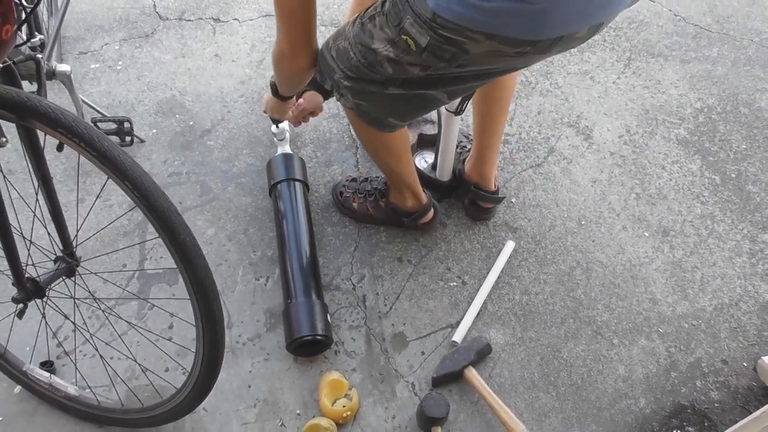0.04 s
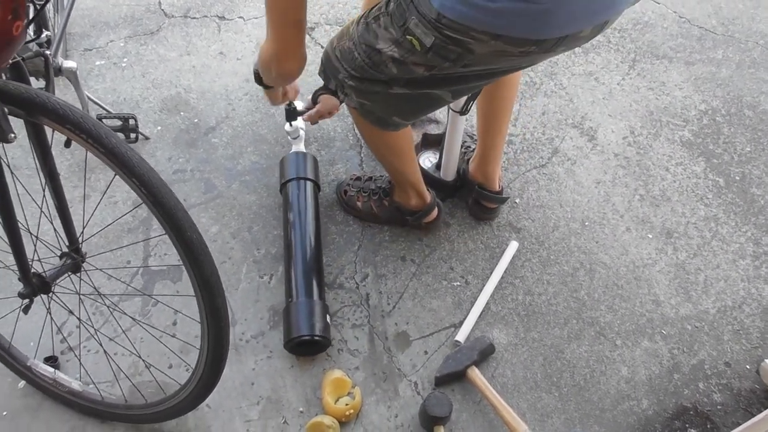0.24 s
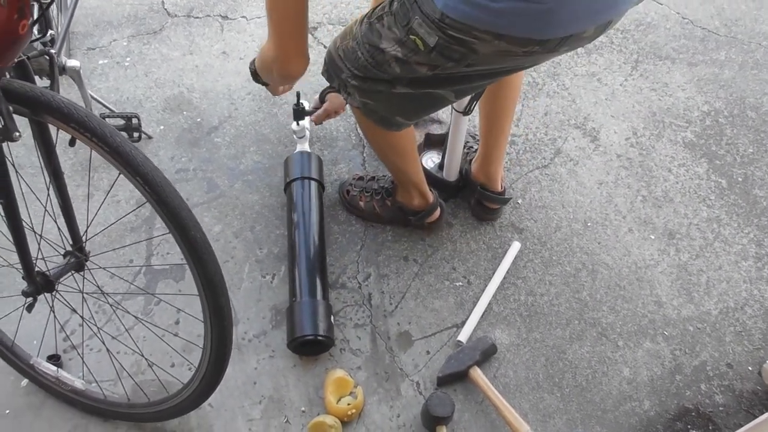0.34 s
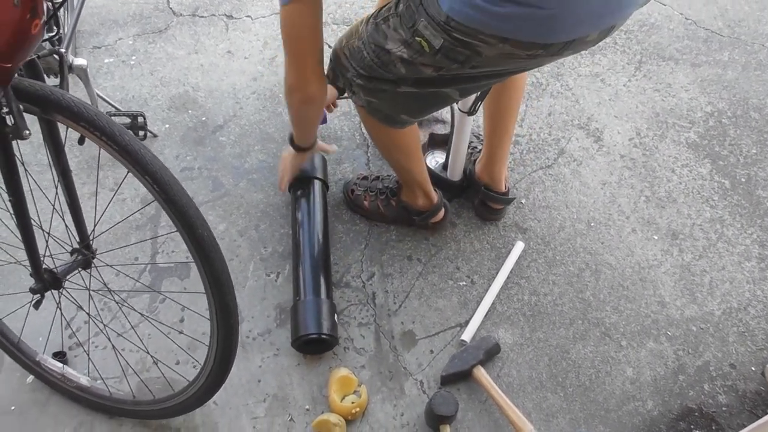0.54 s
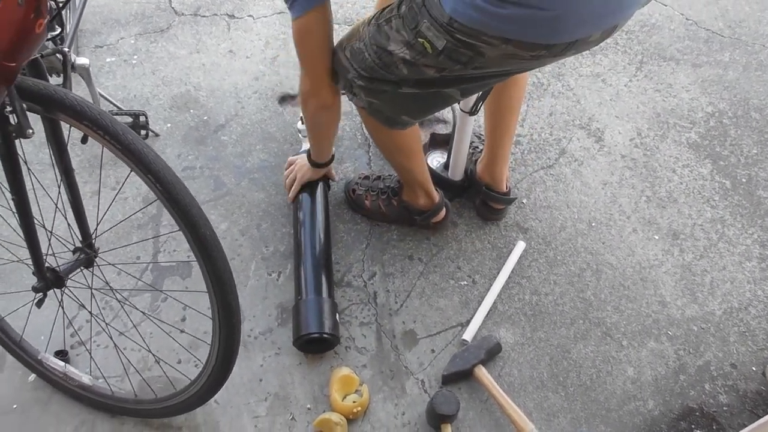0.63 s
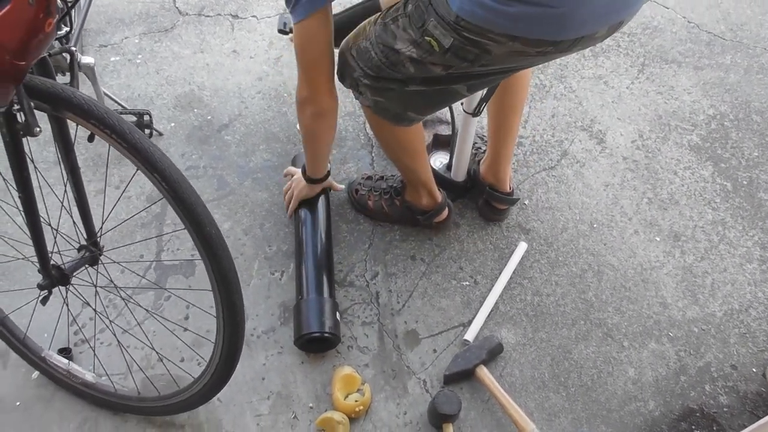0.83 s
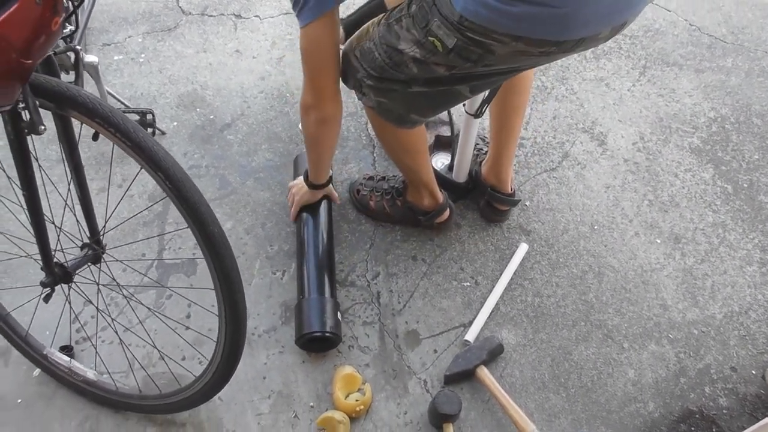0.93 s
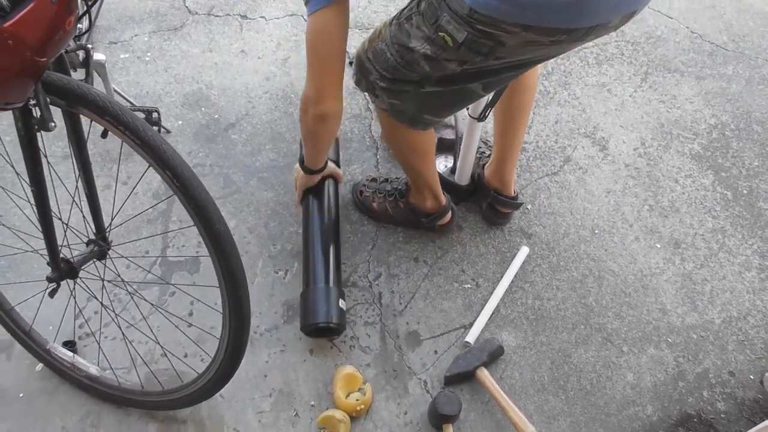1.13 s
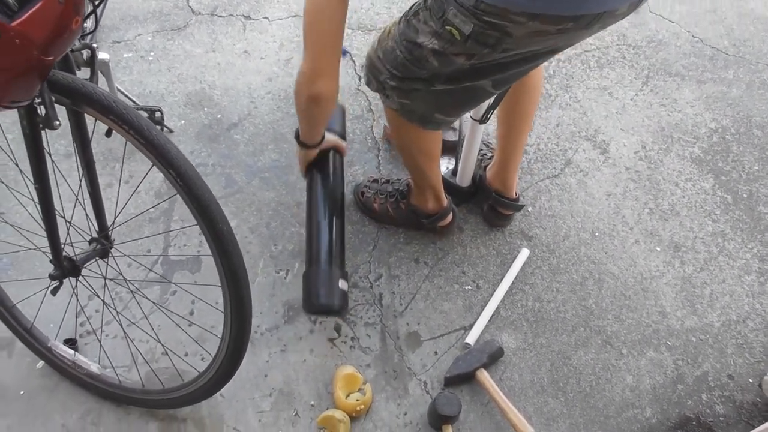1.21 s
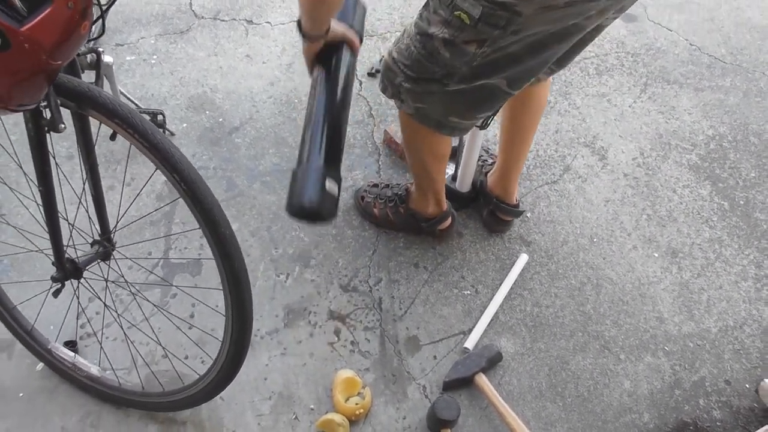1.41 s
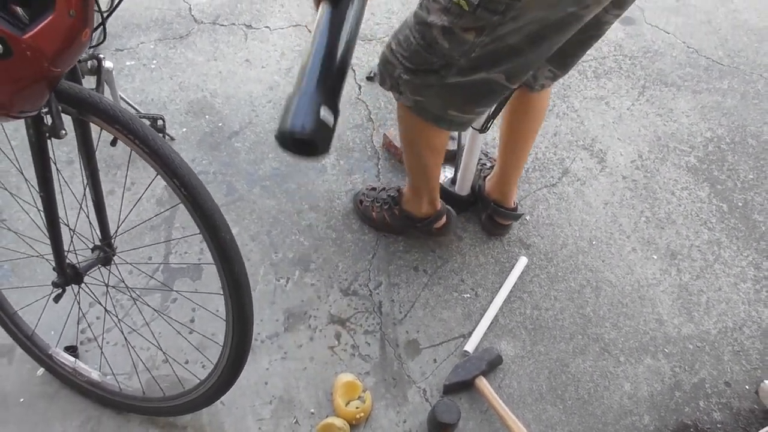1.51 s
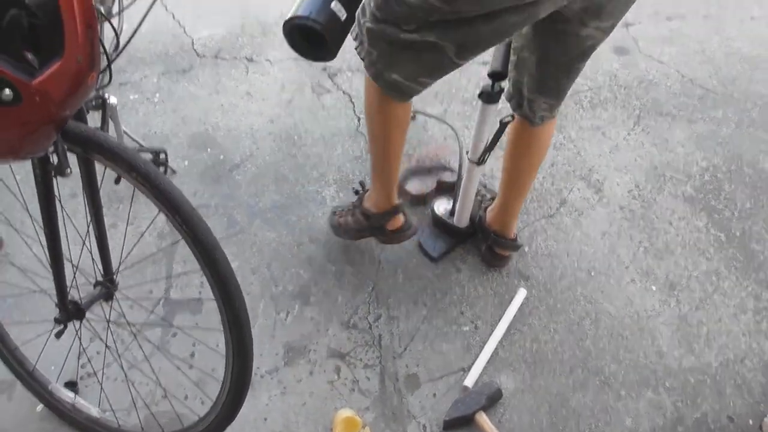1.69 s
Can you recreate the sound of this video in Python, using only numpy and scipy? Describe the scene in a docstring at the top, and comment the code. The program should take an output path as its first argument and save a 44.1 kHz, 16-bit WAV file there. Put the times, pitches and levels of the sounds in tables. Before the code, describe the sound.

A hose coupling hisses and pops off a metal cylinder outdoors. Its latch clunks at 0.2 seconds with a brief hum, and air leaks until a sharp, ringing burst at 0.5. A faint palm swish follows. At 1.0 the cylinder knocks hollowly on concrete, then scrapes over grit until 1.3. Small fittings tap and click around 1.6 to 1.7, over a low, steady open-air background.

```python
"""A hose coupling hisses and pops off a pressurised cylinder lying in a concrete yard.
First its latch clunks and the cylinder hums. Air leaks past the seal, then bursts out and
sets the metal fitting ringing. A palm slides along the cylinder, which knocks on the ground
and scrapes over grit while small parts tap and click. The yard echoes and the open air murmurs."""
import sys
import numpy as np
from scipy import signal
from scipy.fft import rfft, irfft
from scipy.io import wavfile
from scipy.ndimage import uniform_filter1d

SR = 44100
rng = np.random.default_rng(int(sys.argv[2]) if len(sys.argv) > 2 else 0)


def bounce(signal):
    """Save signal as a 16-bit WAV file at the path given by the first command-line argument."""
    frames = np.transpose(np.atleast_2d(signal))
    limited = np.clip(frames, -1, 1)
    pcm = np.round(limited * 32767).astype(np.int16)
    wavfile.write(sys.argv[1], SR, pcm)


N = 77175

# Tone colours: how strong each sound is from bass to treble (frequency [Hz], relative level [dB])
OUTDOOR_TONE = [(20, -11), (55, 1.5), (100, -3.5), (330, -3), (430, -9.5), (850, -9.5), (1300, -22),
                (2800, -33.5), (3800, -31.5), (5100, -40.5), (7600, -28), (10000, -32.5), (16000, -40)]  # open air
SHIMMER_TONE = [(200, -31), (3000, -25.5), (4200, -13), (5300, -15), (6600, 0), (8400, 2), (11000, -10),
                (16000, -14)]  # metal stirred by a palm or by the pop
GRIT_TONE = [(200, 2), (700, 15.5), (1400, 0.5), (2500, -8), (3800, -4), (5200, -11.5), (7600, 0),
             (10500, -15.5), (16000, -29)]  # grit under the cylinder
CLICK_TONE = [(100, -17), (750, -2.5), (2000, -21), (3600, -6.5), (5200, -8), (6600, 2.5), (8200, 0.5),
              (11000, -13), (16000, -23)]  # small fittings
TAP_TONE = [(100, -30), (500, -4), (1000, 1.5), (1450, -6), (1800, -16.5), (3000, -28), (3700, -15),
            (5000, -29), (16000, -42)]  # hollow taps
KNOCK_TONE = [(100, -42), (180, -7.5), (450, -8.5), (650, 1.5), (1000, 2), (1500, -7), (2400, -5),
              (2800, -25), (3300, -6.5), (4100, -21), (5200, -42.5), (16000, -54)]  # cylinder hitting concrete
JUDDER_TONE = [(100, -32), (180, 0), (500, 2), (1000, 0), (1500, -13), (3500, -14), (5200, -25.5),
               (7800, -13.5), (16000, -44)]  # shaking after the knock
THUD_TONE = [(40, -27), (120, -3.5), (255, 7), (450, -6), (700, -5.5), (1200, -20.5), (1800, -33.5),
             (16000, -61)]  # dull part of the latch
SNAP_TONE = [(200, -5), (670, 11.5), (1200, 1), (2000, -9), (2450, -1.5), (2800, -18.5), (3400, -9),
             (5200, -20.5), (16000, -18)]  # sharp part of the latch
HISS_TONE = [(880, -37.5), (2190, -22.5), (3450, -16), (5540, -15.5), (8160, -2), (10100, -6),
             (16000, -4.5)]  # leaking air
PUFF_TONE = [(20, 7.5), (120, 4.5), (250, -2.5), (600, 4), (980, -1.5), (1250, -14.5), (4000, -32.5),
             (16000, -53)]  # low part of the pop
BURST_TONE = [(100, -14), (1500, -13.5), (2400, -13), (2900, -16), (4800, -20), (6200, -5.5), (8000, 0.5),
              (10000, -2), (13000, -1), (16000, -8)]  # bright part of the pop

# Loudness of the sliding palm, the scraping and the leaking air (time [s], level [dB])
SWISH_LEVEL = [(.7, -57), (.83, -62.5), (.885, -55.5), (.935, -79)]
SCRAPE_LEVEL = [(.98, -77), (1.015, -57), (1.06, -37.5), (1.15, -49.5), (1.21, -42.5), (1.28, -50.5),
                (1.35, -71), (1.52, -55.5), (1.66, -59)]
LEAK_LEVEL = [(.2, -55), (.235, -47.5), (.262, -41), (.315, -36.5), (.38, -40), (.45, -45.5), (.49, -40),
              (.5, -27), (.52, -85)]

# Notes that things ring with (frequency [Hz], relative level [dB], time to fade by 60 dB [s])
KNOCK_NOTES = [(191, -2.5, 0.11), (363, -2.5, 0.19), (425, -3.5, 0.17), (655, 2, 0.13), (837, -5, 0.14),
               (950, 0.5, 0.19), (1030, -2.5, .15), (1144, 2, 0.097), (1863, -9, 0.1), (2300, -4, 0.076)]  # cylinder hitting concrete
HUM_NOTES = [(75.6, -10, .25), (142, -9, 0.27), (210.3, -5.5, 0.35), (267, -10, .15), (335, 0, .28),
             (432, -11.5, 0.12), (708, -18, .14), (783, -12, 0.2)]  # cylinder and hose
FITTING_NOTES = [(6092, -8, 0.18), (6900, -9, 0.16), (6778, -13, 0.12), (7400, -11, .14), (7550, -6, 0.047),
                 (7900, -10.5, .09), (8100, -3, 0.13), (7850, -7, .1), (8940, 1, 0.083), (10410, 8, .055),
                 (12500, -4, .06), (13060, 3.5, 0.041)]  # metal fitting after the pop

# Single crunches of grit (time [s], level [dB], strongest frequency [Hz])
GRIT_CRUNCHES = [(1.0491, -12, 8700), (1.1868, -21, 7700), (1.207, -22, 7450), (1.262, -24.5, 7400)]
# Clicks of the fittings (time [s], level [dB])
FITTING_CLICKS = [(.556, -15.5), (0.8139, -22.5), (1.0108, -10.5), (1.6232, -26), (1.6333, -32.5),
                  (1.708, -9), (1.7122, -14.5)]
# Light hollow taps (time [s], level [dB], ring pitch [Hz], ring level [dB], ring fade time [s])
HOLLOW_TAPS = [(0.1839, -15.5, 1010, -17.5, 0.033), (1.5917, -24, 975, -17, 0.14),
               (1.7092, -14, 715, -16.5, 0.087)]
# Clunks of the latch (time [s], thud [dB], hum [dB], snap [dB], ping [dB], ping pitch [Hz])
LATCH_CLUNKS = [(0.2102, 1, -28, -14, -13, 6640), (0.2214, -17, 2.5, -3.5, -7, 7520),
                (0.3134, -4.5, -9, -45, -45, 7600)]

# Length of the yard's echo (frequency [Hz], time to fade by 60 dB [s])
ECHO_FADE = [(100, .3), (350, .22), (700, 0.08), (3000, 0.5), (7500, .5), (15000, 0.23)]
# Strength of the yard's echo (frequency [Hz], level [dB])
ECHO_LEVEL = [(60, -22), (300, -13.5), (800, -14), (2400, -12), (3400, -7.5), (7500, -11), (15000, -17)]
# Stereo width: gain on the part that differs between left and right (frequency [Hz], gain [dB])
SIDE_GAIN = [(2100, 1.5), (2800, -10.5), (5800, -25), (6900, -36), (7500, -3), (14000, 12)]

GRAIN_WIDTH = 0.21  # stereo width of the rubbing and the grit; 0 is mono


def amp(db):
    """Turn decibels into a number to multiply by."""
    return 10 ** (np.asarray(db) / 20)


def value_at(points, hz):
    """Look up a table at any frequency, gliding between its rows on a pitch scale."""
    freqs, values = np.transpose(points)
    return np.interp(np.log(hz + 1), np.log(freqs + 1), values)


def loudness(points):
    """Join (time, level) points into a smooth gain, near silence before and after."""
    return amp(np.interp(np.arange(N) / SR, *np.transpose(points), left=-120, right=-120))


def unit_energy(x):
    """Scale a sound to an average energy of one per channel."""
    return x / np.sqrt(np.mean(np.sum(x ** 2, -1)) + 1e-20)


def add(mix, start_s, sound):
    """Mix a sound in at its start time."""
    part = mix[:, round(start_s * SR):][:, :sound.shape[-1]]
    part += sound[..., :part.shape[1]]


def noise(count, width):
    """Stereo white noise; more width makes left and right less alike."""
    mid, side = rng.standard_normal((2, count))
    return np.array([mid + width * side, mid - width * side])


def colour(x, tone, size=4096):
    """Give a sound a tone colour, with a filter that never rings ahead of the sound."""
    log_gain = np.log(amp(value_at(tone, abs(np.fft.fftfreq(size, 1 / SR)))))
    response = np.fft.ifft(np.exp(np.conj(signal.hilbert(log_gain)))).real[:size // 2]
    return signal.fftconvolve(x, response[None], axes=1)[:, :x.shape[1]]


def peak(hz, slope_db):
    """A tone colour with one hump, slope_db weaker an octave to either side."""
    return [(hz / 2, -slope_db), (hz, 0), (hz * 2, -slope_db)]


def hit(tone, fade_s, rattle, width, size=8192):
    """One sharp push and a rattle that drops 60 dB in fade_s, both given a tone colour."""
    fade = amp(-60 * np.arange(size) / SR / fade_s)
    push = rattle * unit_energy(noise(size, width) * fade)
    push[:, 0] += 1
    return unit_energy(colour(push, tone))


def ring(notes, width, sharp=0, settle_s=0.03):
    """Fading pure notes; they start too high by the fraction `sharp`, then settle."""
    t = np.arange(SR // 2) / SR
    bent_time = t + sharp * settle_s * (1 - np.exp(-t / settle_s))
    skews = width * rng.standard_normal((len(notes), 1, 1)) * [[1], [-1]]  # left and right out of step
    return unit_energy(sum(amp(db - 60 * t / fade_s) * np.sin(2 * np.pi * hz * bent_time + skew)
                           for (hz, db, fade_s), skew in zip(notes, skews)))


def outdoors(level_db=-48):
    """The open air murmurs, low and steady."""
    murmur = colour(noise(N, width=0.16), OUTDOOR_TONE)
    return amp(level_db) * murmur / murmur.std()


def yard_echo(x, delay_s=0.006):
    """Ground and walls scatter the sound back, each frequency fading at its own speed."""
    hz, t, bands = signal.stft(noise(SR, width=0.43), SR, nperseg=256)
    fade_s = value_at(ECHO_FADE, hz)[:, None]
    fade = amp(value_at(ECHO_LEVEL, hz)[:, None] - 60 * t / fade_s)
    balance = np.sqrt(2 * np.log(1000) / fade_s / SR)  # a longer fade adds no energy
    tail = signal.istft(bands * fade * balance, SR, nperseg=256)[1]
    out = np.zeros((2, N))
    add(out, delay_s, signal.fftconvolve(x, tail, axes=1))
    return out


def palm_swish():
    """A palm slides over the smooth metal, which rings faintly in the treble."""
    rub = colour(noise(N, GRAIN_WIDTH), SHIMMER_TONE)
    return rub / rub.std() * loudness(SWISH_LEVEL)


def grit_scrape(grains_per_s=5000, spread_db=1.5):
    """Grit grinds under the cylinder in many tiny grains of random strength."""
    grains = rng.random(N) < grains_per_s / SR
    strength = amp(spread_db * np.minimum(rng.exponential(1, N), 4))
    grinding = colour(grains * strength * noise(N, GRAIN_WIDTH), GRIT_TONE)
    return grinding / grinding.std() * loudness(SCRAPE_LEVEL)


def grit_crunches():
    """A few bright crunches of grit stand out from the scraping."""
    out = np.zeros((2, N))
    for start_s, db, hz in GRIT_CRUNCHES:
        add(out, start_s, amp(db) * hit(peak(hz, slope_db=32), fade_s=0.04, rattle=9, width=GRAIN_WIDTH))
    return out


def small_parts(overtone_ratio=3.85, overtone_db=-15):
    """Small parts tap with a short hollow ring, and fittings click."""
    out = np.zeros((2, N))
    for start_s, db, hz, ring_db, fade_s in HOLLOW_TAPS:
        notes = [(hz, 0, fade_s), (hz * overtone_ratio, overtone_db, fade_s / 2)]
        add(out, start_s, amp(db) * hit(TAP_TONE, fade_s=0.075, rattle=1, width=0.19))
        add(out, start_s, amp(ring_db) * ring(notes, width=0))
    for start_s, db in FITTING_CLICKS:
        add(out, start_s, amp(db) * hit(CLICK_TONE, fade_s=0.016, rattle=2, width=0.21))
    return out


def cylinder_knock(start_s=1.0108, low_cut_hz=170):
    """The cylinder clacks on the concrete, rings hollowly and judders."""
    out = np.zeros((2, N))
    low_cut = signal.butter(4, low_cut_hz, "high", fs=SR, output="sos")
    add(out, start_s, amp(-0.5) * signal.sosfilt(low_cut, ring(KNOCK_NOTES, width=0)))
    add(out, start_s, amp(6.5) * hit(KNOCK_TONE, fade_s=0.012, rattle=0.85, width=0.22))
    add(out, start_s, amp(-1.5) * hit(JUDDER_TONE, fade_s=0.18, rattle=10, width=0.26))
    return out


def latch(hum_rise_s=0.0059, damp_from_s=0.34, damp_db_per_s=400):
    """The latch thuds, snaps and pings; a hum builds in the cylinder until the hand damps it."""
    out = np.zeros((2, N))
    swell = 1 - np.exp(-np.arange(SR // 2) / SR / hum_rise_s)
    for start_s, thud_db, hum_db, snap_db, ping_db, ping_hz in LATCH_CLUNKS:
        ping_tone = peak(ping_hz, slope_db=49)
        add(out, start_s, amp(thud_db) * hit(THUD_TONE, fade_s=0.12, rattle=0.97, width=0.33))
        add(out, start_s, amp(hum_db) * unit_energy(swell * ring(HUM_NOTES, width=0, sharp=0.04)))
        add(out, start_s, amp(snap_db) * hit(SNAP_TONE, fade_s=0.063, rattle=1.2, width=0.25))
        add(out, start_s, amp(ping_db) * hit(ping_tone, fade_s=0.03, rattle=0.8, width=0.37))
    damped_for_s = np.maximum(np.arange(N) / SR - damp_from_s, 0)
    return out * amp(-damp_db_per_s * damped_for_s)


def air_leak(flutter_db=0.36):
    """Air squeezes past the seal with a slightly fluttering hiss."""
    flutter = uniform_filter1d(rng.standard_normal(N), 300)
    hiss = colour(noise(N, width=0.19), HISS_TONE) * amp(flutter_db * flutter / flutter.std())
    return hiss / hiss.std() * loudness(LEAK_LEVEL)


def coupling_pop(start_s=0.4969):
    """The coupling lets go: air bursts out with a low puff, and the metal fitting rings."""
    out = np.zeros((2, N))
    add(out, start_s, amp(11) * hit(BURST_TONE, fade_s=0.029, rattle=2.5, width=0.13))
    add(out, start_s, amp(7.5) * hit(PUFF_TONE, fade_s=0.014, rattle=0.26, width=0.58))
    add(out, start_s, amp(2) * ring(FITTING_NOTES, width=0.1))
    add(out, start_s, amp(8.5) * hit(SHIMMER_TONE, fade_s=0.1, rattle=14, width=0.12))
    return out


def scene():
    """Mix the nearby sounds, their echo and the open air."""
    near = latch() + air_leak() + coupling_pop()
    near += cylinder_knock() + small_parts() + grit_crunches() + palm_swish() + grit_scrape()
    return near + yard_echo(near) + outdoors()


def wind_filter(x, below_hz=170, limit_db=-36, recover_db_per_s=80):
    """Turn the bass down whenever it gets loud, then let it come back."""
    bass = signal.sosfiltfilt(signal.butter(2, below_hz, fs=SR, output="sos"), x)
    bass_power = signal.lfilter([0.005], [1, -0.995], bass.mean(0) ** 2)  # running average
    bass_db = 10 * np.log10(bass_power + 1e-12)
    fall_db = np.arange(N) * recover_db_per_s / SR
    held_db = np.maximum.accumulate(bass_db + fall_db) - fall_db  # jumps up, sinks slowly
    excess_db = np.maximum(held_db - limit_db, 0)
    cut_db = signal.lfilter([0.002], [1, -0.998], 2 * excess_db)  # twice the excess, smoothed
    return x - bass * (1 - amp(-cut_db))


def record(dry, ceiling=0.85, top_hz=16100):
    """Tame the bass, reshape the stereo width, flatten the peaks and cut the highest treble."""
    left, right = wind_filter(dry)
    side_gain = amp(value_at(SIDE_GAIN, np.fft.rfftfreq(N, 1 / SR)))
    side = irfft(rfft((left - right) / 2) * side_gain, N)
    mid = (left + right) / 2
    flattened = np.clip([mid + side, mid - side], -ceiling, ceiling)
    treble_cut = signal.firwin(255, top_hz, window=("kaiser", 8), fs=SR)
    return signal.oaconvolve(flattened, treble_cut[None], "same")


dry = scene()
out = record(dry)
bounce(out)
```